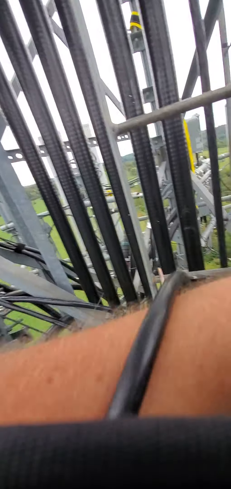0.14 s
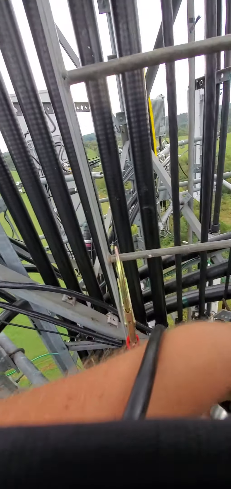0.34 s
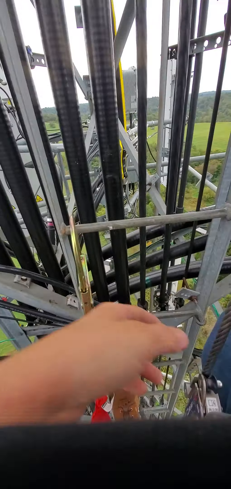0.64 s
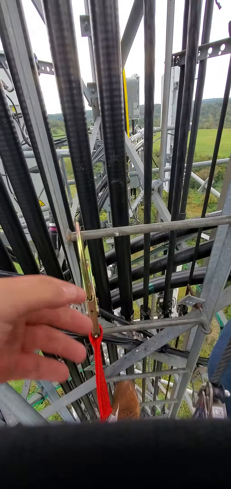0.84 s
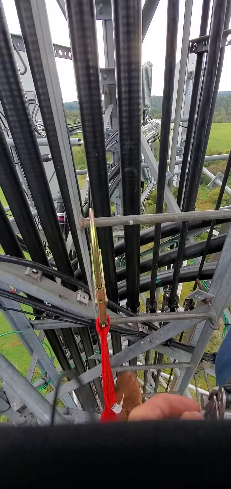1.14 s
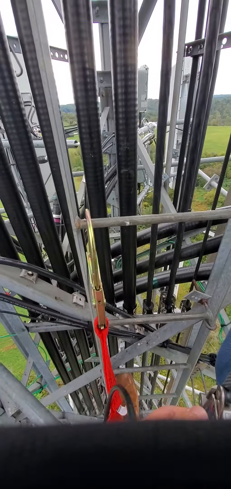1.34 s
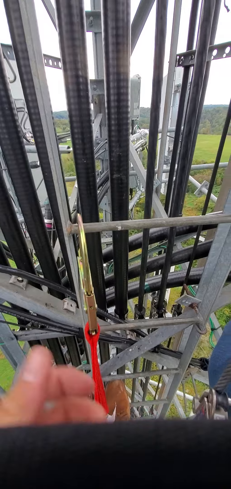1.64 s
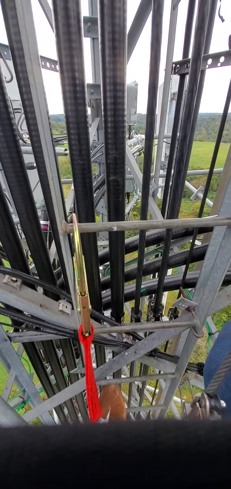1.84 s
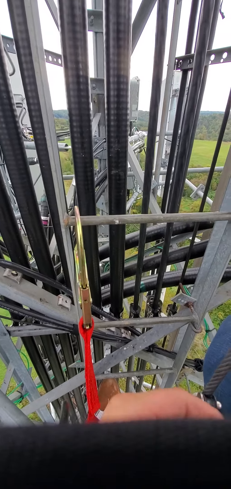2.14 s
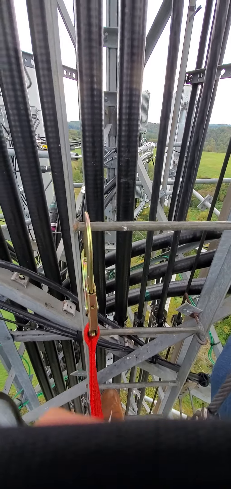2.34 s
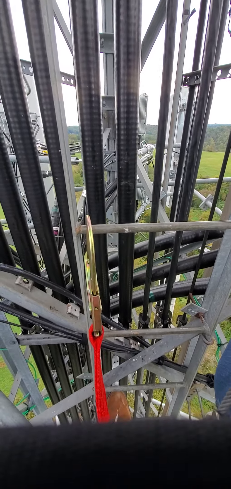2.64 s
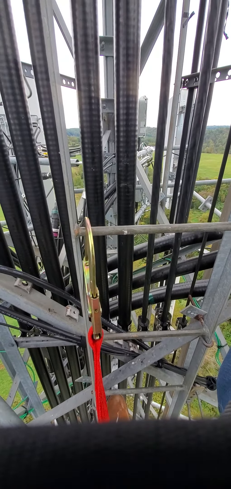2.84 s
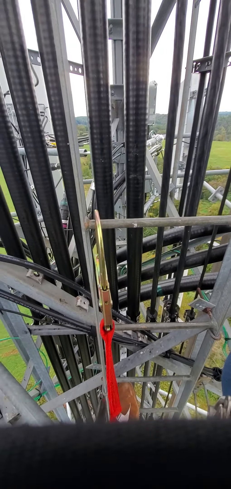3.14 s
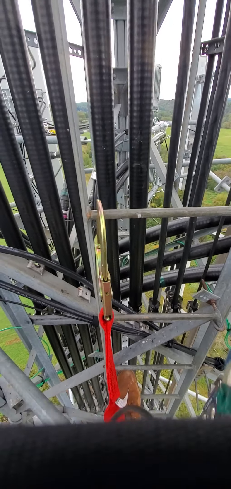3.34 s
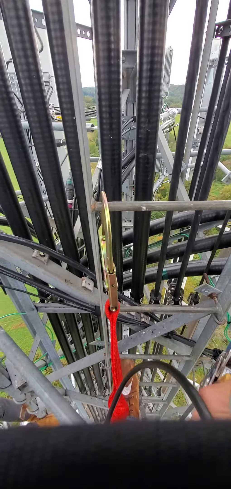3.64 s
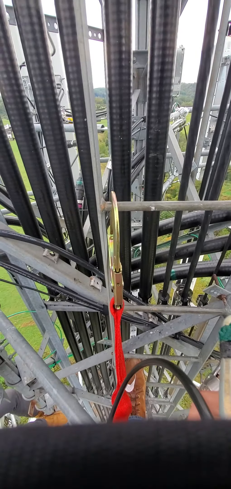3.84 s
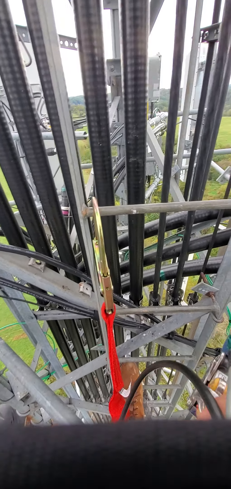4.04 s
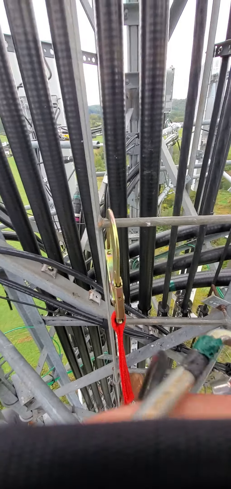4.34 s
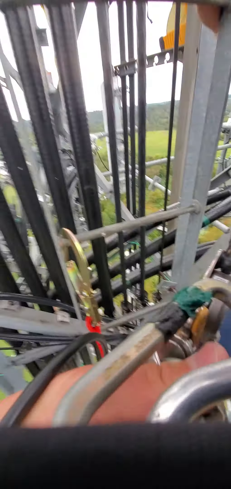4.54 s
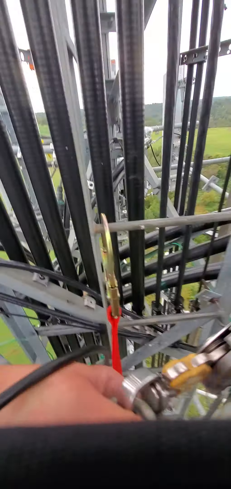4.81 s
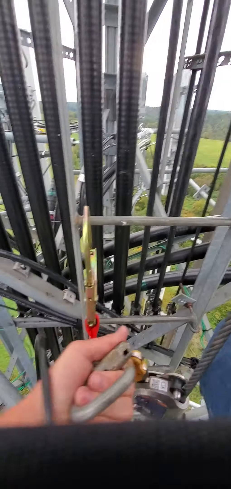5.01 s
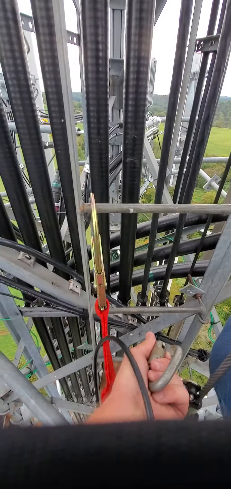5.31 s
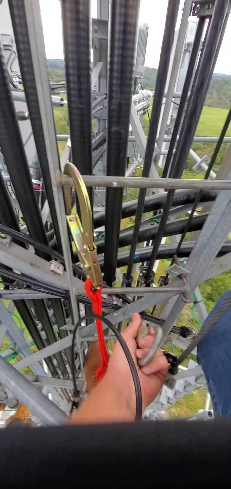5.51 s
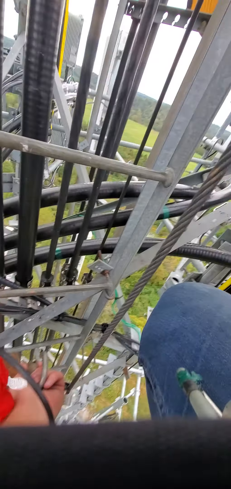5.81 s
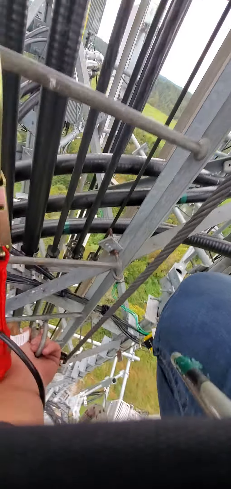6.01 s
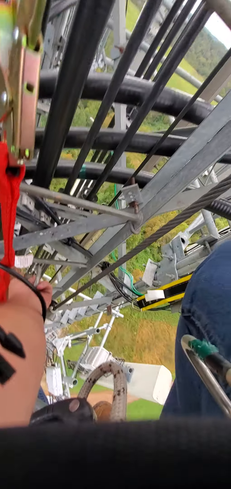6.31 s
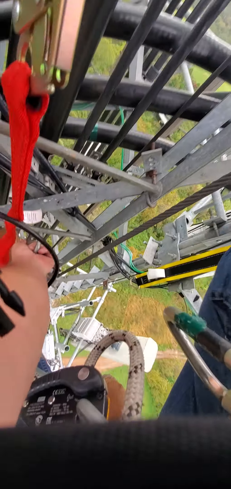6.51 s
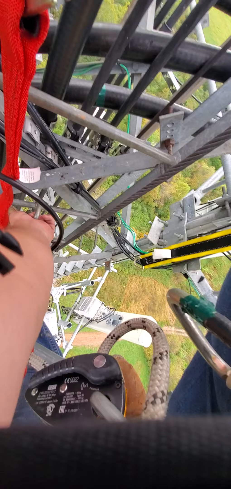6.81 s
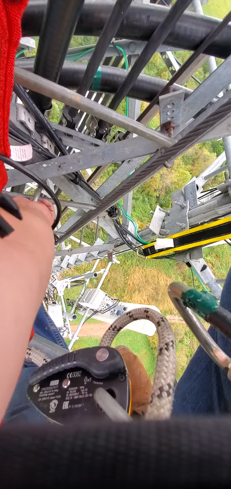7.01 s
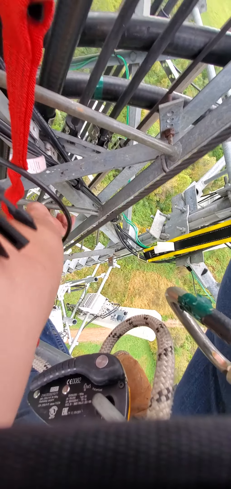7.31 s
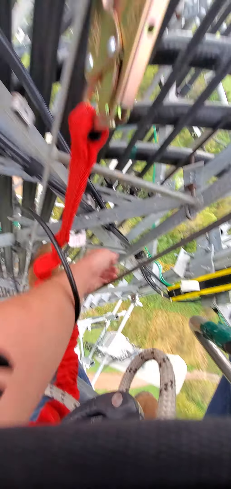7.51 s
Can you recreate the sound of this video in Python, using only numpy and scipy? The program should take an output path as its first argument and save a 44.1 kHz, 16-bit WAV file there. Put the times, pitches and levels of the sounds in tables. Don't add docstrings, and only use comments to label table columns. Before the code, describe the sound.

A climber handles snap hooks and rope gear very close to a chest-worn stereo microphone, in the open with no echo. Irregular clacks and small ticks mix with rustling sleeves, webbing and dull harness thuds. After a sparse stretch come sharp bright rattles, another pause, then a denser burst with a briefly ringing hook. Tiny gate squeaks follow, and finally hard blows make the steel lattice ring.

```python
import sys
import numpy as np
from scipy import signal
from scipy.io import wavfile
from scipy.ndimage import uniform_filter1d

SR = 44100
rng = np.random.default_rng(int(sys.argv[2]) if len(sys.argv) > 2 else 0)


def log_audio(samples):
    frames = np.atleast_2d(samples).T
    limited = np.clip(frames, -1, 1)
    pcm = np.round(limited * 32767).astype(np.int16)
    wavfile.write(sys.argv[1], SR, pcm)


def level_to_linear(level):
    exponent = np.asarray(level, float) / 20
    return 10 ** exponent


N = 337798

# (t/s, peak level/dB, f/Hz, brightness/dB)
GRIPPED_CLACKS = [(.232, -21, 3100, -21), (.257, -16.5, 2260, -31), (.4438, -11.5, 2010, -11),
                  (.6895, -11, 3000, -9), (2.6259, -23, 5900, -13), (3.1842, -8.5, 3320, -12),
                  (3.2867, -21, 2840, -15), (3.3843, -4.5, 2970, -7), (3.4057, -4, 5380, -25),
                  (3.492, -24, 3880, -22), (3.7087, -13, 2620, -9), (4.323, -29, 2290, -26),
                  (4.4794, -15.5, 2290, -9), (4.5126, -19, 2800, -10), (4.6294, -5.5, 3760, -17),
                  (4.67, -17, 2880, -21), (4.744, -22, 4200, -36), (4.9598, -2.5, 4630, -11),
                  (5.5356, -29, 1110, -20), (6.1769, -28.5, 3150, -16), (3.2958, -13.5, 4080, -28),
                  (.548, -23, 2010, -13), (3.3165, -16, 3230, -15), (3.352, -23, 4100, -15),
                  (3.3862, -18, 5500, -15), (3.451, -15.5, 2400, -18), (3.565, -26.5, 2140, -9),
                  (4.5475, -33, 1830, -16), (6.83, -34.5, 5160, -18), (3.4316, -16.5, 2830, -21)]
CUPPED_CLACKS = [(.391, -20, 2340, -8), (.5665, -15.5, 4650, -7), (.5869, -19.5, 2150, -14),
                 (.7027, -18.5, 1960, -18), (1.2232, -23.5, 2800, -41), (2.5687, -13, 2300, -45),
                 (2.9946, -15, 3220, -10), (3.034, -26, 2720, -16), (3.1518, -8, 2450, -43),
                 (4.3998, -13, 4300, -31), (4.486, -17, 2860, -14), (4.534, -20.5, 2230, -21),
                 (4.5545, -13, 1930, -20), (4.576, -23, 3800, -19), (4.6937, -13, 6200, 0),
                 (4.8548, -10.5, 4180, -17), (4.9217, -24, 2840, 3), (5.026, -15, 5340, -23),
                 (5.052, -20, 5340, -17), (5.4477, -22, 3430, -27), (6.1035, -16, 3050, -20),
                 (6.115, -17, 3630, -25)]
LOOSE_CLACKS = [(.0176, -26.5, 1670, -24), (.7442, -24, 1850, -17), (1.3384, -33, 6000, -16),
                (1.7423, -24.5, 2720, -16), (2.198, -19, 2520, -38), (2.4177, -21.5, 2200, -23),
                (2.677, -30, 4900, -19), (2.8983, -33, 1310, -31), (4.149, -33, 2160, -17),
                (4.3312, -11.5, 3700, -39), (4.608, -23, 1680, -10), (4.8121, -15.5, 3000, -13),
                (5.312, -25.5, 2480, -20)]
GRIPPED_T60_S, CUPPED_T60_S, LOOSE_T60_S = 0.028, 0.051, 0.095
# (t/s, peak level/dB, f/Hz, brightness/dB)
CHATTERS = [
    (.2825, -17.5, 2740, -11),
    (.6546, -16.5, 4900, -13),
    (3.3285, -6.5, 3450, -2.5),
    (4.4362, -5, 3520, 3.5),
    (4.4995, -8.5, 3150, -6),
    (4.599, -15.5, 1830, -20),
]
CHATTER_T60_S, CHATTER_HOLD_S = 0.021, 0.0049
# (t/s, peak level/dB, f/Hz)
TICKS = [(0.0124, -22, 1430), (0.0485, -30, 4800), (0.0965, -34, 2590), (0.126, -23.5, 2740),
         (0.2043, -45, 2070), (0.369, -22, 2350), (0.457, -19, 1370), (0.498, -31, 2490),
         (0.7174, -27, 1940), (0.8577, -24, 2250), (1.0884, -30, 1190), (1.6931, -46, 1740),
         (1.937, -26, 2120), (2.306, -24.5, 4000), (2.401, -25, 2380), (2.4934, -25, 2510),
         (2.5336, -28, 1670), (2.6589, -32, 6000), (2.69, -33, 4850), (2.7104, -20, 2800),
         (2.758, -23.5, 2700), (3.256, -23, 2870), (3.424, -15, 3050), (3.5214, -39, 2370),
         (3.5374, -48, 2450), (3.554, -21, 1920), (3.5865, -22, 2160), (3.8519, -26.5, 1420),
         (3.9142, -27, 2150), (4.039, -24.5, 4000), (4.175, -24.5, 2490), (4.2947, -26.5, 2390),
         (4.4658, -15, 2230), (4.777, -30, 3490), (4.8172, -15, 3050), (5.1014, -42, 2190),
         (5.125, -23, 5300), (5.199, -26, 4570), (5.273, -20, 3420), (5.3742, -23, 5670),
         (5.5603, -19, 2240), (5.5886, -26, 2320), (5.618, -31, 2230), (5.725, -20, 2190),
         (6.0674, -24, 3470), (6.2003, -36, 2200), (6.239, -35, 2230), (6.6618, -40, 2080),
         (6.685, -22.5, 2200), (6.9003, -36, 2300), (7.0843, -38, 3370), (7.3294, -40, 2070)]
TICK_T60_S, TICK_BRIGHT_DB = 0.041, -12.5
# (t/s, half length/s, level/dB)
DRAGS = [(.3, .03, -38), (.575, 0.017, -44), (3.3, 0.017, -36.5), (3.334, 0.0029, -22), (3.352, 0.01, -51),
         (3.432, 0.011, -33), (3.465, 0.014, -40), (3.575, 0.025, -43.5), (4.47, 0.013, -43),
         (4.51, 0.0091, -31.5), (4.56, 0.015, -43), (4.61, .012, -29), (4.815, 0.012, -44),
         (4.865, 0.02, -33), (4.93, 0.021, -47), (4.985, 0.0083, -34.5), (5.6, 0.062, -45.5)]
DRAG_PER_S, DRAG_LOW_HZ, DRAG_HIGH_HZ, DRAG_CYCLES, DRAG_SPREAD_DB = 1400, 1200, 6000, 18, 5.0
# (t/s, peak level/dB, time until held again/s, upper modes/dB, lower modes/dB)
FREE_HOOK_HITS = [
    (4.332, -22, .11, 1, 0),
    (4.400, -21, .04, -21, 3),
    (4.671, -36, .009, -25, -10),
]
HELD_HOOK_HITS = [
    (4.960, -18, 0, -22, -20),
]
# (f/Hz, level/dB, time to fall 60 dB/s)
HOOK_MODES = [(3763, -2, .09), (4430, -12, .04), (7415, -1, .3), (7385, -9, .2), (10180, 9, .08),
              (10550, -8, .07), (11680, -6, .07)]
# (t/s, peak level/dB, favoured f/Hz, decay scale, ringing over wash/dB)
RUNG_BLOWS = [
    (6.7455, -16.5, 2060, 0.74, 5.5),
    (7.160, -28, 2240, 0.73, -6),
    (7.570, -25, 2370, 0.044, 11),
]
RAIL_BLOWS = [
    (6.9546, -18.5, 3180, 0.6, 10.5),
    (7.5935, -6.5, 2430, 0.65, 2.8),
]
BRACE_BLOWS = [
    (6.0912, -6, 3550, 0.17, 3),
    (7.1745, -2, 4100, 0.79, 6),
    (7.2058, -6.5, 3700, 0.26, 2),
    (7.2283, -8, 4400, 0.35, -3),
    (7.2485, -3.5, 3300, 0.71, -10),
]
GUSSET_BLOWS = [
    (7.2525, -14, 3800, 0.92, 14),
    (7.272, -21, 1600, 0.44, 6),
    (7.329, -31, 2037, .5, 8),
    (6.80, -36.5, 2269, .6, 7),
    (7.596, -17, 4100, .25, 0),
    (7.604, -13, 3200, 0.31, 2),
]
# (f/Hz, level/dB, time to fall 60 dB/s)
RUNG_MODES = [(377, -13, 0.27), (1110, -6, 0.34), (1400, -17, 0.38), (1930, 2, 0.26), (2190, -12, 0.3),
              (2437, -3, 0.32), (2960, -17, .15), (3050, -19, .1), (3350, -1, 0.16), (3470, -2, 0.32),
              (4200, 5, 0.086), (4560, -3, 0.17), (4960, 5, 0.077)]
RAIL_MODES = [(2085, -7.5, 0.86), (2343, 3, 0.15), (2740, -5, 0.25), (2920, -1, 0.15), (3220, -5, 0.29),
              (3250, 5, 0.14), (3430, -7, 0.34), (4030, -21, 0.26), (4770, -9, .18), (5430, -10, 0.35),
              (4380, -1, .08), (5610, -8, .24), (3500, -11, 0.49), (420, -22, 0.15)]
BRACE_MODES = [(390, -7.5, 0.51), (579, -1, 0.084), (1250, -27, 0.64), (2030, -21, 0.73), (2460, -14, 0.3),
               (2820, -8, 0.14), (3126, 5.5, 0.17), (3490, 0, 0.41), (3700, -26, 0.27), (3860, -13, 0.15),
               (4150, 11.5, 0.084), (4870, -8, 0.073), (4930, -2, 0.33), (5680, -8, 0.51)]
GUSSET_MODES = [(1287, -18, .4), (1911, -12, .33), (2089, -12, .3), (2358, -10, .27), (2918, -12, .28),
                (3160, -9, .27), (3375, -15, .3), (3467, -13, .36), (3682, -12, .28), (3871, 5, .2),
                (4140, -14, .16), (4802, -20, .3), (5292, -22, .45), (5739, -24, .2)]
# (f/Hz, level per Hz/dB)
WASH_SPECTRUM = [(300, 0), (565, -6), (900, 6), (1600, 1.5), (3100, 9), (5500, 6.5), (7800, 4), (16000, 0)]
# (f/Hz, time to fall 60 dB/s)
WASH_T60 = [(400, 1), (2000, 0.55), (5000, 0.21), (12000, 0.16)]
# (t/s, length/s, start f/Hz, end
# f/Hz, level/dB)
SQUEAKS = [(.281, .013, 14000, 14100, -30), (.520, .035, 10300, 10600, -30), (.545, .03, 10800, 11300, -37),
           (2.68, .025, 4750, 4650, -40), (7.1598, .011, 2160, 2130, -31), (7.5697, .005, 2300, 2250, -32),
           (3.94, .025, 5300, 5300, -44), (5.133, .018, 5300, 5200, -32), (5.15, .028, 5150, 4950, -39),
           (5.18, .075, 4750, 4600, -53), (5.255, .015, 5500, 5450, -41), (5.37, .075, 5800, 5750, -46),
           (5.644, .02, 5000, 5050, -28), (5.681, .011, 5050, 5100, -35), (5.705, .014, 5450, 5500, -41),
           (5.738, .01, 5750, 5800, -42), (5.772, .01, 5850, 5900, -41), (4.982, .016, 5800, 5900, -33),
           (5.03, .05, 5450, 5500, -42), (5.03, .045, 7000, 7100, -45), (1.105, .015, 7800, 7800, -50),
           (2.785, .015, 11200, 11200, -48)]
SQUEAK_OVERTONES_DB = -25
# (t/s, peak level/dB, f/Hz)
THUDS = [(0.017, -13, 510), (0.028, -24, 71), (0.079, -22, 550), (3.362, -28, 145), (4.453, -25, 595),
         (0.345, -17.5, 450), (0.443, -8.5, 430), (0.584, -12, 287), (0.65, -20, 108), (1.929, -18, 457),
         (2.931, -28.5, 79), (4.451, -14, 390), (4.498, -9.5, 400), (4.542, -13.5, 453), (4.623, -1.5, 503),
         (4.847, -14.5, 585), (5.028, -15.5, 282), (5.537, -19.5, 380), (5.554, -20.5, 350),
         (5.625, -24, 420), (5.878, -17, 440), (6.748, -19.5, 560), (7.176, -21.5, 543)]
# (t/s, peak level/dB, f/Hz)
MORE_THUDS = [
    (2.569, -25.5, 150),
    (3.152, -24, 300),
    (3.185, -22.5, 200),
    (3.709, -23.5, 500),
    (3.7095, -34, 170),
    (2.199, -29, 350),
]
# (t/s, level/dB)
SHIFTS = [(.0, -41.5), (0.238, -38.5), (.46, -37), (.65, -36), (0.962, -43.5), (1.28, -48), (1.682, -43.5),
          (1.962, -42.5), (2.29, -45), (2.52, -43.5), (2.72, -47), (2.97, -42), (3.22, -42), (3.518, -35.5),
          (3.89, -51.5), (4.12, -49), (4.36, -49), (4.55, -34.5), (4.95, -41.5), (5.2, -46), (5.602, -44.5),
          (5.919, -35.5), (6.3, -40.5), (6.488, -40), (6.79, -39.5), (7.25, -42), (7.44, -48)]
# (t/s, half length/s, level/dB, fine hiss level/dB)
SWISHES = [(-0.002, 0.079, -46.5, -61), (0.337, 0.22, -42, -53.5), (0.588, 0.11, -39.5, -50.5),
           (0.7, 0.027, -37.5, -60), (0.95, 0.33, -49, -62.5), (1.33, 0.063, -48.5, -60),
           (1.744, 0.18, -47, -56.5), (1.982, 0.063, -49, -55), (2.37, 0.3, -50.5, -61),
           (2.526, 0.24, -46.5, -58.5), (2.706, 0.03, -42.5, -66), (2.97, 0.14, -45.5, -57),
           (3.398, 0.12, -38, -52.5), (3.597, 0.19, -49.5, -57), (3.882, 0.2, -54, -67),
           (4.205, 0.16, -51.5, -64), (4.451, 0.055, -33.5, -46), (4.58, 0.092, -40, -64),
           (4.913, 0.11, -34, -47.5), (5.076, 0.35, -45, -60), (5.396, 0.029, -43, -72),
           (5.643, 0.053, -36, -48), (5.785, 0.22, -42.5, -54), (6.075, 0.13, -42, -53.5),
           (6.35, 0.26, -45.5, -58.5), (6.77, 0.083, -48.5, -73.5), (7.083, 0.36, -50.5, -66.5),
           (7.446, 0.088, -46.5, -67), (7.66, 0.034, -41, -47)]
# (f/Hz, level per Hz/dB)
RUMBLE_SPECTRUM = [(22, -28), (75, -3), (150, -15), (220, -15)]
RUB_SPECTRUM = [(150, -23.5), (285, -2), (410, 1.5), (600, -7), (1300, -18)]
CLOTH_SPECTRUM = [(800, -24), (1500, 3), (2300, -2), (4000, 0), (5500, -5.5), (7000, -1.5), (9000, -2)]
HISS_SPECTRUM = [(7400, -8), (9000, 0.5), (12500, -8.5), (16200, 4.5)]
RUMBLE_DB, RUB_REST_DB, RUB_FOLLOWS, CLOTH_REST_DB, HISS_REST_DB = 4, -51.5, 0.015, -88, -67
SHIFT_HALF_S, RUMBLE_FOLLOWS = 0.12, 0.87
RISE_SHARE, STROKE_FALL_DB, STROKE_SHAPE = 0.88, 7.5, 1.31
HOUSING_HZ, HOUSING_WIDTH_HZ, HOUSING_GAIN = 2210, 220, 1.3
# (t/s, chest pressure on the housing level/dB, left-right balance of the work/dB)
POSTURE = [(0, -48.5, -4), (.67, -55.5, -1.5), (1.1, -51, 0), (2.5, -54, -2.5), (3.2, -50, -2.5),
           (3.9, -63.5, -1.5), (4.66, -48, -2.5), (5.0, -55, -1), (5.25, -61.5, 0.5), (6.0, -59, -3.5),
           (6.66, -59, -1.2), (7.0, -72, 1), (7.5, -61, 0.5)]


def at_hz(points, hz):
    table_hz, values = np.transpose(points)
    return np.interp(np.log(hz), np.log(table_hz), values)


def in_time(rows):
    s, *columns = np.transpose(rows)
    return [np.interp(np.arange(N) / SR, s, column) for column in columns]


def drift(rate_hz):
    r = np.exp(-2 * np.pi * rate_hz * 16 / SR)
    noise = rng.standard_normal(N // 16 + 2002)
    slow = signal.lfilter([1], [1, -2 * r, r * r], noise)[2000:]
    return np.interp(np.arange(N) / 16, np.arange(len(slow)), slow / slow.std())


def bands(spectrum):
    low, high = spectrum[0][0], min(spectrum[-1][0], 0.45 * SR)
    edges = np.geomspace(low, high, 2 + int(2 * np.log2(high / low)))
    slices = []
    for a, b in zip(edges, edges[1:]):
        centre = np.sqrt(a * b)
        sos = signal.butter(2, [a, b], "band", fs=SR, output="sos")
        slices.append((centre, sos, level_to_linear(at_hz(spectrum, centre))))
    return slices


def add(out, sound, s):
    i = max(int(s * SR), 0)
    out[:, i:i + sound.shape[1]] += sound[:, :N - i]


def peak_one(x):
    return x / np.abs(x.mean(axis=0)).max()


def rms_one(x):
    return x * np.sqrt(2 / np.mean(x ** 2))


def modes(t, hz, gain, t60, spread):
    phase = np.stack([0 * hz, rng.normal(0, spread, len(hz))])
    spin = 2j * np.pi * hz - np.log(1000) / t60
    tones = np.exp(np.outer(spin, t).astype(np.complex64))
    return np.imag(gain * np.exp(1j * phase) @ tones)


def resonate(x, hz, r):
    return signal.lfilter([1], [1, -2 * r * np.cos(2 * np.pi * hz / SR), r * r], x)


def strokes(rows, rest_db):
    power, t = level_to_linear(2 * rest_db) + np.zeros(N), np.arange(N) / SR
    for s, half_s, level_db in rows:
        near = slice(max(int((s - 4 * half_s) * SR), 0), int((s + 4 * half_s) * SR))
        side_s = half_s * np.where(t[near] < s, RISE_SHARE, 1)
        x = np.abs(t[near] - s) / side_s
        power[near] += level_to_linear(2 * (level_db - STROKE_FALL_DB * x ** STROKE_SHAPE))
    return np.sqrt(power)


def clacks(hits, t60, hold_s=0, size=3000):
    out, t = np.zeros((2, N)), np.arange(size) / SR
    top = signal.butter(1, [7000, 12500], "band", fs=SR, output="sos")
    r = np.exp(-np.pi * 260 / SR)
    for s, level_db, hz, bright_db in hits:
        rebound = t - rng.uniform(0.0015, 0.0031)
        first = 0.62 * level_to_linear(-60 * t / 0.0038)
        second = 0.5 * (rebound > 0) * level_to_linear(-60 * np.abs(rebound) / 0.009)
        decay = level_to_linear(-60 * np.maximum(t - hold_s, 0) / t60) * (1 + first + second)
        grit = rng.standard_normal((2, size)) * level_to_linear(5.16 * np.minimum(rng.exponential(1, size), 4)) * decay
        grit[1] = 0.55 * np.roll(grit[0], rng.integers(-12, 12)) + 0.96 * grit[1]
        body = signal.butter(2, [hz / 3.15, min(hz * 2.35, 9000)], "band", fs=SR, output="sos")
        broad = signal.sosfilt(body, grit)
        ring = signal.lfilter([1, 0, -1], [1, -2 * r * np.cos(2 * np.pi * hz / SR), r * r], grit)
        crack = level_to_linear(bright_db) * peak_one(signal.sosfilt(top, grit))
        knock = peak_one(peak_one(broad) + 0.5 * peak_one(ring)) + crack
        add(out, level_to_linear(level_db - 0.5) * knock * np.minimum(t / 0.00034, 1), s - 0.0003)
    return out


def hook(hits, hold_db_per_s):
    out, t = np.zeros((2, N)), np.arange(7000) / SR
    hz, mode_db, t60 = np.transpose(HOOK_MODES)
    for s, level_db, free_s, upper_db, lower_db in hits:
        struck_db = mode_db + upper_db * (hz > 9000) + lower_db * (hz < 5000)
        ring = modes(t, hz, level_to_linear(struck_db), t60, 0.6)
        held = level_to_linear(-hold_db_per_s * np.maximum(t - free_s, 0))
        add(out, level_to_linear(level_db) * ring * held, s)
    return out


def lattice(blows, member, rise_s):
    out, t = np.zeros((2, N)), np.arange(12000) / SR
    bank = bands(WASH_SPECTRUM)
    hz, mode_db, t60 = np.repeat(member, 3, axis=0).T
    partner = np.arange(len(hz)) % 3 > 0
    hz = hz * (1 + partner * rng.normal(0, 0.009, len(hz)))
    mode_db = mode_db - 4 * partner
    for s, level_db, centre_hz, scale, ringing_db in blows:
        scale = np.clip(scale, 0.05, 1.6)
        octaves = np.minimum(np.abs(np.log2(hz / centre_hz)), 0.9)
        strength_db = mode_db - 6.5 * octaves + rng.normal(0, 1.5, len(hz))
        lines = modes(t, hz, level_to_linear(strength_db), t60 * scale * 1.45, 1.2)
        white = rng.standard_normal((2, 2, len(t))) * level_to_linear(3 * np.minimum(rng.exponential(1, len(t)), 3))
        wash = 0
        for k, (f, sos, gain) in enumerate(bank):
            fall_db = 8.0 * abs(np.log2(f / centre_hz)) + 60 * t / (scale * at_hz(WASH_T60, f))
            wash = wash + signal.sosfilt(sos, white[k % 2]) * gain * level_to_linear(-fall_db)
        impact = 1 + 1.13 * level_to_linear(-60 * t / 0.019)
        blow = level_to_linear(ringing_db) * peak_one(lines) + peak_one(wash * impact)
        add(out, level_to_linear(level_db) * peak_one(blow * np.minimum(t / rise_s, 1)), s)
    return out


def squeaks():
    out = np.zeros((2, N))
    for s, length, start_hz, end_hz, level_db in SQUEAKS:
        x = np.linspace(0, 1, int(length * SR))
        waver, flutter = uniform_filter1d(rng.standard_normal((2, len(x))), size=120) * np.sqrt(120)
        hz = (start_hz + (end_hz - start_hz) * x) * (1 + 0.0043 * waver)
        turns = 2 * np.pi * np.cumsum(hz) / SR + np.array([[0], [rng.uniform(0, 1.85)]])
        overtones = (np.sin(2 * turns) + np.sin(3 * turns)) * (start_hz < 6000)
        tone = np.sin(turns) + level_to_linear(SQUEAK_OVERTONES_DB) * overtones
        swell = np.sqrt(np.sin(np.pi * x) + 1e-9)
        add(out, tone * swell * level_to_linear(level_db + 4.5 * flutter), s)
    return out


def drag():
    born = rng.random(N) < DRAG_PER_S * level_to_linear(4.0 * drift(60)) / SR
    clicks = born * level_to_linear(DRAG_SPREAD_DB * np.minimum(rng.exponential(1, N), 4)) * rng.choice([-1, 1], N)
    dealt, out = rng.integers(0, 12, N), np.zeros((2, N))
    for k, hz in enumerate(np.geomspace(DRAG_LOW_HZ, DRAG_HIGH_HZ, num=12)):
        r = level_to_linear(-60 * hz / (DRAG_CYCLES * SR))
        ring = np.sin(2 * np.pi * hz / SR) * resonate(clicks * (dealt == k) + 1e-18, hz, r)
        out += np.array([ring, np.roll(ring, rng.integers(-14, 14))])
    return strokes(DRAGS, -90) * rms_one(out)


def thuds(rows):
    out, t = np.zeros((2, N)), np.arange(6000) / SR
    for s, level_db, hz in rows:
        pitches = hz * np.array([1, 1.45, 0.62])
        push = modes(t, pitches, np.array([1, 0.45, 0.4]), 8.0 / pitches, 1.26)
        push = push * np.minimum(t * hz / 0.496, 1) ** 2
        add(out, level_to_linear(level_db - 2.0) * push / np.abs(push).max(), s)
    return out


def scrape():
    born = rng.random(N) < 900 * level_to_linear(5.5 * drift(25)) / SR
    clicks = born * level_to_linear(6 * np.minimum(rng.exponential(1, N), np.e)) * rng.choice([-1, 1], N)
    dealt, out = rng.integers(0, len(RAIL_MODES), N), np.zeros((2, N))
    r = level_to_linear(-60 / (0.01 * SR))
    for k, hz in enumerate(np.transpose(RAIL_MODES)[0]):
        ring = resonate(clicks * (dealt == k) + 1e-18, hz, r)
        out += np.sin(2 * np.pi * hz / SR) * np.array([ring, np.roll(ring, rng.integers(-14, 14))])
    return rms_one(out)


def friction(spectrum, jerk, jerk_db, patchy_db, grit_db):
    white = rng.standard_normal((2, 2, N)) * level_to_linear(grit_db * np.minimum(rng.exponential(1, N), 2.8))
    out = 0
    for k, (_, sos, gain) in enumerate(bands(spectrum)):
        out = out + signal.sosfilt(sos, white[k % 2]) * gain * level_to_linear(patchy_db * drift(10.7))
    return rms_one(out * level_to_linear(jerk_db * jerk))


def movement(press_db):
    rub_rest_db = RUB_REST_DB + RUB_FOLLOWS * (press_db - press_db.mean())
    rub = strokes([(s, SHIFT_HALF_S, level_db) for s, level_db in SHIFTS], rub_rest_db)
    swish = strokes([row[:3] for row in SWISHES], CLOTH_REST_DB)
    hiss = strokes([(s, half_s, hiss_db) for s, half_s, _, hiss_db in SWISHES], HISS_REST_DB)
    jerk = 0.54 * drift(25.0) + 0.5 * drift(61)
    rumble = level_to_linear(press_db + RUMBLE_DB) * (rub / level_to_linear(-45)) ** RUMBLE_FOLLOWS
    low = rumble * friction(RUMBLE_SPECTRUM, jerk, 0.72, 4.8, 0.09)
    low = low + rub * friction(RUB_SPECTRUM, jerk, 3.0, 2.5, 3.0)
    muffle = signal.butter(8, 7500, fs=SR, output="sos")
    cloth = signal.sosfilt(muffle, friction(CLOTH_SPECTRUM, jerk, 4.2, 2.6, 3.0))
    b, a = signal.iirpeak(HOUSING_HZ, HOUSING_HZ / HOUSING_WIDTH_HZ, fs=SR)
    cloth = cloth + HOUSING_GAIN * signal.lfilter(b, a, cloth)
    metal = level_to_linear(1.0) * (swish / level_to_linear(-37)) ** 0.8 * scrape()
    fine = hiss * friction(HISS_SPECTRUM, jerk, 2.04, 1.0, 3.0)
    return low + swish * level_to_linear(-2.5) * (cloth + metal) + fine


def microphone(x):
    for hz, width_hz, gain_db in [(6540, 210, 1.5), (8040, 1240, -5.5)]:
        b, a = signal.iirpeak(hz, hz / width_hz, fs=SR)
        x = x + (level_to_linear(gain_db) - 1) * signal.lfilter(b, a, x)
    treble = signal.sosfilt(signal.butter(1, 7000, "high", fs=SR, output="sos"), x)
    return level_to_linear([[-0.7], [0.7]]) * x + treble * np.array([[0.3], [-0.3]])


def scene():
    press_db, pan_db = in_time(POSTURE)
    steel = lattice(RUNG_BLOWS, RUNG_MODES, 0.00084)
    steel += lattice(RAIL_BLOWS, RAIL_MODES, 0.0031)
    steel += lattice(BRACE_BLOWS, BRACE_MODES, 0.0019)
    gear = clacks(GRIPPED_CLACKS, GRIPPED_T60_S, size=1400)
    gear += clacks(CUPPED_CLACKS, CUPPED_T60_S, size=2200)
    gear += clacks(LOOSE_CLACKS, LOOSE_T60_S)
    gear += clacks(CHATTERS, CHATTER_T60_S, CHATTER_HOLD_S)
    ticks = [(s, level_db - 7.5, hz, TICK_BRIGHT_DB) for s, level_db, hz in TICKS]
    gear += clacks(ticks, TICK_T60_S, size=1000)
    sources = movement(press_db) + gear + thuds(THUDS)
    sources += hook(FREE_HOOK_HITS, 3000) + hook(HELD_HOOK_HITS, 400)
    sources += steel + squeaks()
    sources += lattice(GUSSET_BLOWS, GUSSET_MODES, 0.003) + drag() + thuds(MORE_THUDS)
    return sources * level_to_linear(np.array([[0.5], [-0.5]]) * pan_db)


def band_limit(x):
    return signal.sosfilt(signal.butter(12, 16820, fs=SR, output="sos"), x)


def record(dry):
    clipped = np.clip(microphone(dry), -1, 1)
    top_cut = signal.cheby2(16, 80, 16900, fs=SR, output="sos")
    mix = signal.sosfilt(top_cut, clipped)
    return band_limit(mix)


dry = scene()
out = record(dry)
log_audio(out)
```